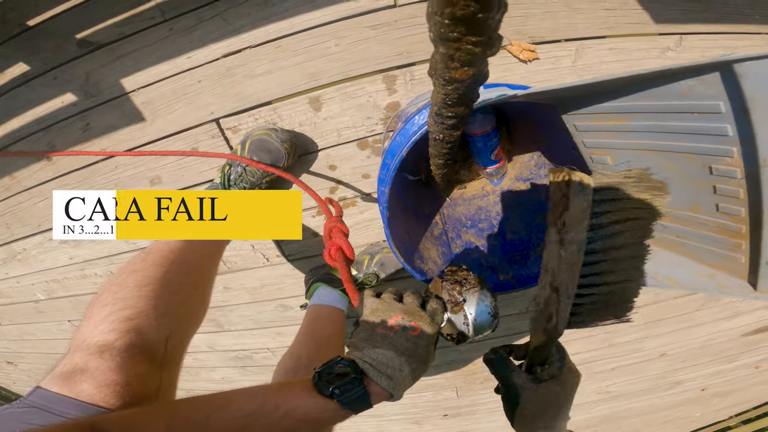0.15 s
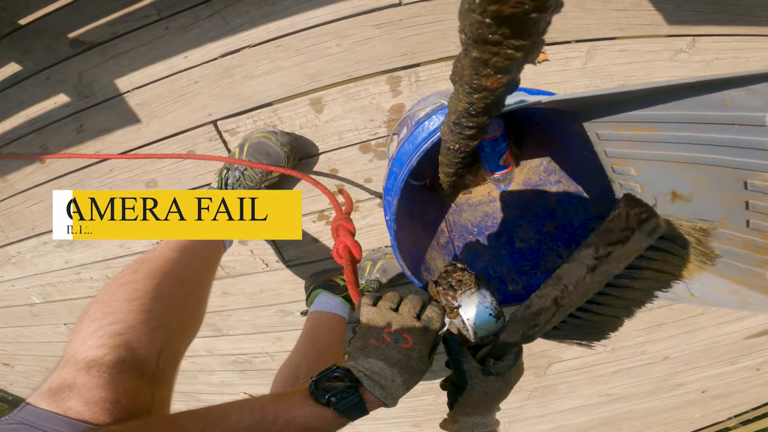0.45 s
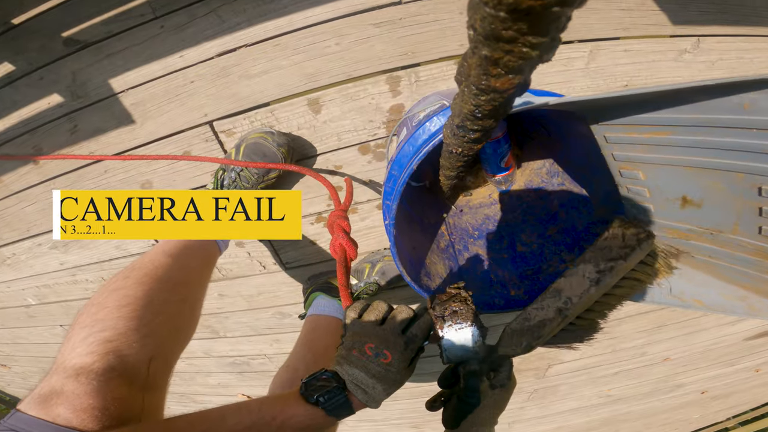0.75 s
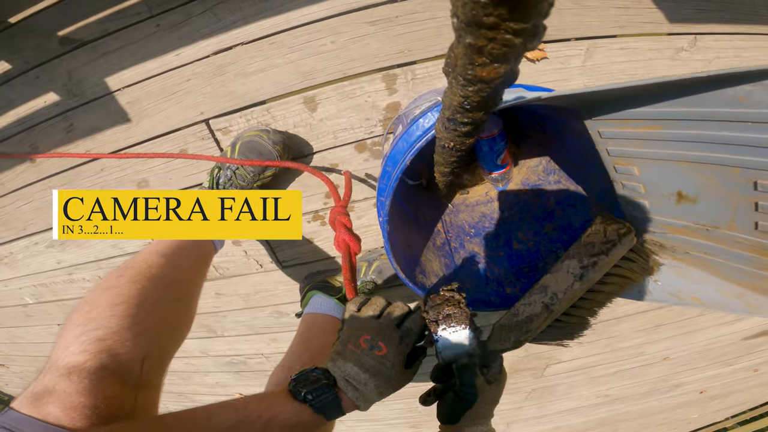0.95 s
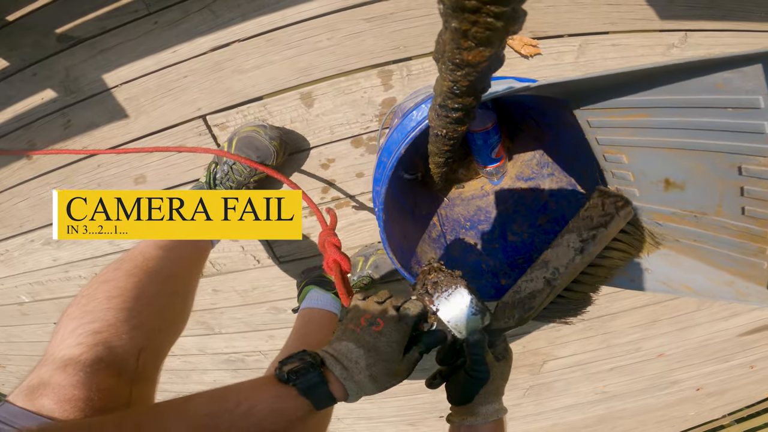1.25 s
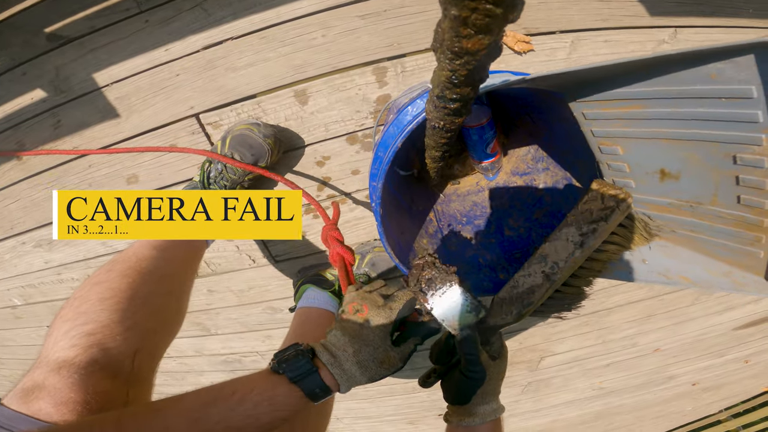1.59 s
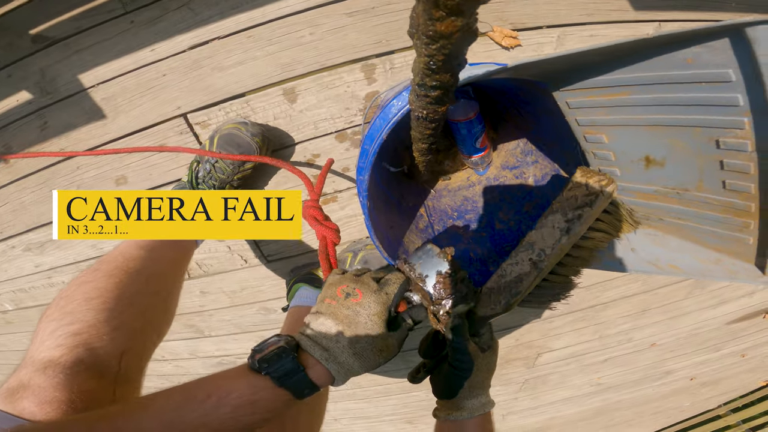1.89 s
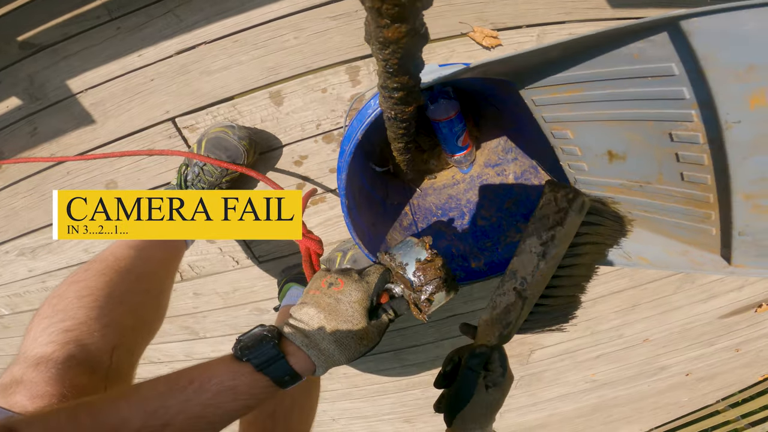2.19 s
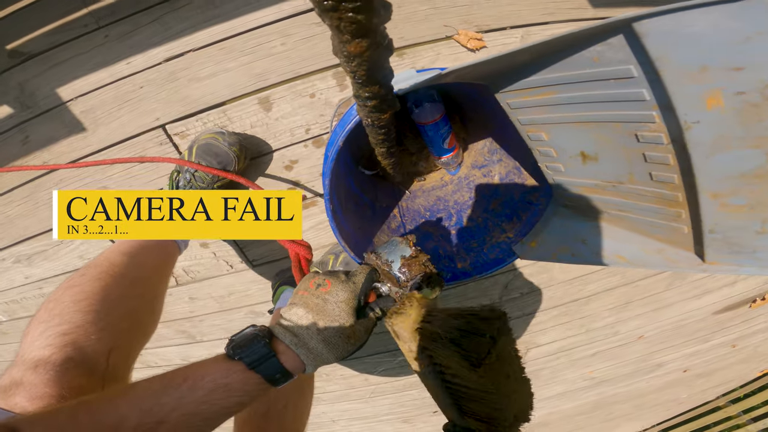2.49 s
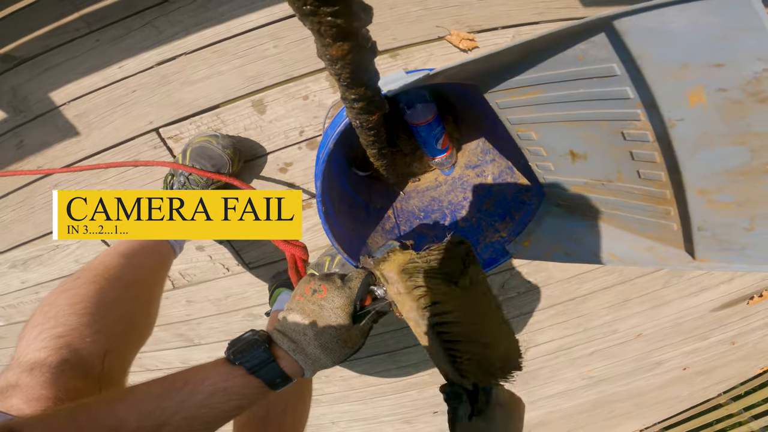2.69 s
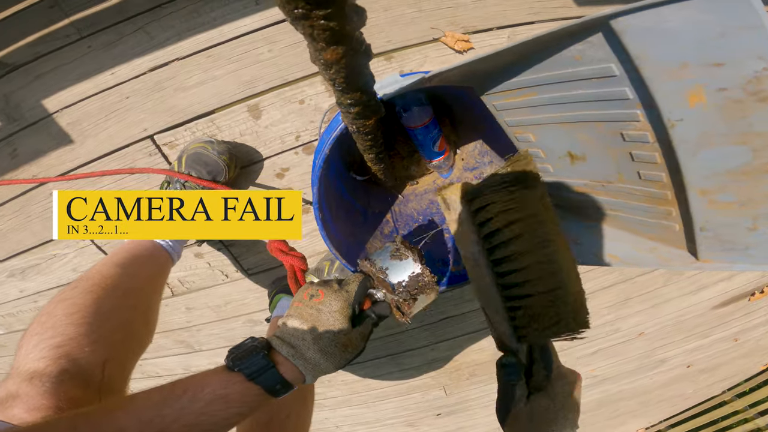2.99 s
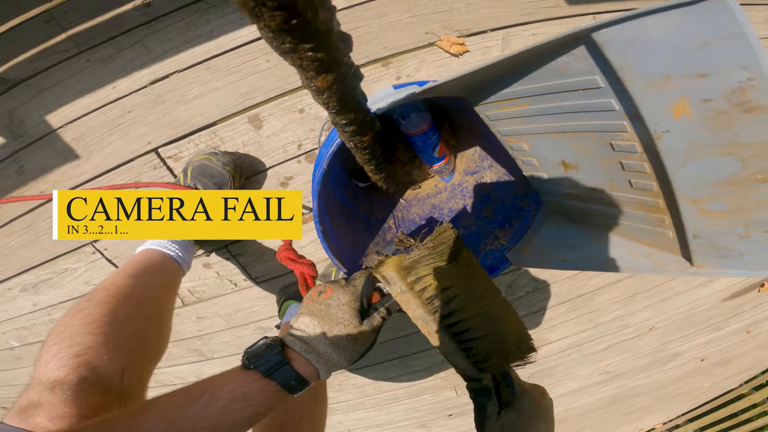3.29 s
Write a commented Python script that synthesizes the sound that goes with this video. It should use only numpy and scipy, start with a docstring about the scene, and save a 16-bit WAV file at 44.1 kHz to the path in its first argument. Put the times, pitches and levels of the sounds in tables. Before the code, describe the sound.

Close, gritty brush scrapes on rusty metal come first, then scattered knocks, a pause, and a harder final flurry of knocks and scrubbing; insects hiss steadily all around outdoors, with a faint far rumble.

```python
"""Rough rubs ring a hollow rusty fitting inside a dense hiss of insects, on a wooden deck outdoors.
A gloved hand works a stiff brush on the metal over a plastic tub: noisy forces ring the modes of both.
Sharp knocks ring the fitting and thump the tub; bristles spit bright grit as showers of coloured clicks.
Flickering noise makes the insect chorus and a low far rumble; gliding narrow bands and thin whistles call.
Gain control pulls the loudest moments down and recovers slowly."""
import sys
import numpy as np
from scipy import signal
from scipy.fft import rfft, irfft
from scipy.io import wavfile
from scipy.ndimage import uniform_filter1d

SR = 44100
rng = np.random.default_rng(int(sys.argv[2]) if len(sys.argv) > 2 else 0)


def master_out(mix):
    """Clip the mix to full scale and print it as 16-bit PCM to the path in sys.argv[1]."""
    frames = np.transpose(np.atleast_2d(mix))
    ceiling = np.clip(frames, -1, 1)
    pcm = np.round(ceiling * 32767).astype(np.int16)
    wavfile.write(sys.argv[1], SR, pcm)


def volts(x):
    """Linear amplitude factor 10**(x/20) for a level x in dB, scalar or array-like."""
    e = np.asarray(x, float) / 20
    return 10 ** e


N = 152145

# ringing modes of the metal fitting: pitch_hz, level_db (relative), t60_s (undamped)
FITTING_MODES = [(525, -6, 0.03), (843, -3.5, 0.027), (923, -2.5, 0.028), (1103, 3, 0.034),
                 (1284, -8, 0.067), (1430, -6, 0.042), (1631, -4.5, 0.05), (1880, -7.5, 0.022),
                 (2196, -7.5, 0.027), (2383, -7, 0.027), (2543, -8.5, 0.031), (2880, -12.5, 0.028),
                 (4360, -14, 0.022), (5380, -23, 0.013)]
# ringing modes of the plastic tub: pitch_hz, level_db (relative), t60_s
TUB_MODES = [(96.8, 0, 0.11), (138.6, 2.5, 0.13), (184.5, 0.5, 0.11), (238, 0.7, 0.062), (332, -5, 0.059),
             (454, -13, 0.044)]


def rms_one(x):
    """Scale a sound to an rms of 1."""
    return x / np.sqrt(np.mean(x ** 2) + 1e-20)


def at_hz(points, hz):
    """Read a curve of (Hz, dB) points along log frequency."""
    curve = np.array(points)
    return np.interp(np.log(hz), np.log(curve[:, 0]), curve[:, 1])


def level(rows):
    """Gain over time from (s, dB) points."""
    return volts(np.interp(np.arange(N) / SR, *np.transpose(rows)))


def swell(s, rise, fall, db):
    """A rounded rise and fall about the loudest moment."""
    t = np.arange(N) / SR - s
    place = np.clip(np.where(t < 0, t / rise, t / fall), -1, 1)
    return volts(db) * np.cos(np.pi / 2 * place) ** 2


def drift(rate):
    """Slow chance of spread 1: noise twice through a low-pass at rate Hz, drawn every 40 samples."""
    r = np.exp(-80 * np.pi * rate / SR)
    noise = rng.standard_normal(N // 40 + 2002)
    slow = signal.lfilter([1], [1, -2 * r, r * r], noise)[2000:]  # skip the filter's start
    return np.interp(np.arange(N) / 40, np.arange(len(slow)), rms_one(slow))


def ring(x, hz, t60):
    """A resonance: a unit click sets a decaying sine of starting height 1 ringing."""
    r, w = volts(-60 / (t60 * SR)), 2 * np.pi * hz / SR
    return signal.lfilter([0, np.sin(w)], [1, -2 * r * np.cos(w), r * r], x + 1e-18)


def colour(x, spectrum):
    """Shape a sound by a spectrum of (Hz, dB) points, held level beyond its ends."""
    hz = np.arange(N // 2 + 1) * SR / N + 1e-3
    return irfft(rfft(x) * volts(at_hz(spectrum, hz)), N)


def grains(rate, spread_db):
    """Random clicks of uneven size and either sign, at a mean rate per second; rms 1."""
    sizes = volts(spread_db * np.minimum(rng.exponential(1, N), 5)) * rng.choice([-1, 1], N)
    return rms_one(sizes * (rng.random(N) < rate / SR))


def struck(force, start, modes, pitch=1, hardness_db=0, damping=1, spread_db=1.2):
    """A short force rings every mode; soft contact favours the middle modes, hard contact the high ones."""
    out = np.zeros(N + SR)
    luck = rng.normal(0, spread_db, len(modes))  # each contact excites the modes unevenly
    signs = np.resize([1, -1], len(modes))
    force = np.pad(force, (0, SR // 6))  # room to ring on
    rung = 0
    for (hz, db, t60), luck_db, sign in zip(modes, luck, signs):
        octaves = np.log2(hz / 1120)
        tilt_db = min(hardness_db * octaves, abs(hardness_db) * octaves)
        # the grip shifts the hollow's air modes (Hz range); the metal's modes stay
        shift = pitch if 700 < hz < 1500 else 1
        rung = rung + sign * volts(db + luck_db + tilt_db) * ring(force, hz * shift, t60 * damping)
    out[start:start + len(force)] = rung
    return out[:N]


def rubs():
    """Dense slips under each rub drive the fitting and, more weakly, the tub."""
    # loudest_s, length_s, level_db (relative), pitch_factor, hardness_db_per_octave
    rub_rows = [(0.077, 0.09, -31.5, 1, -4), (0.126, 0.063, -33, 1.13, -0.5), (0.155, .04, -30, 1.02, -9),
                (0.185, .055, -23.5, 0.99, -10), (0.222, 0.045, -23, 1.03, -8),
                (0.246, 0.03, -24.5, 1.01, -20), (0.34, 0.29, -37, 1, 2.5), (0.476, 0.089, -32, 0.93, 3),
                (0.512, 0.038, -30, 1.04, 2), (0.552, 0.069, -29.5, 0.91, 1.5), (0.593, 0.061, -32, .92, 2),
                (0.729, 0.034, -33.5, 1.13, 6), (0.776, 0.067, -31.5, 0.83, 2.5),
                (0.88, 0.59, -39.5, 1.02, 2), (1.111, 0.075, -31.5, 1.16, 1), (1.681, 0.14, -32, 0.93, 2),
                (1.718, 0.038, -34.5, .9, 18), (1.741, 0.085, -29, 0.84, 2), (1.786, 0.08, -23, 0.93, 7),
                (1.821, 0.072, -21, .92, 3.5), (1.85, 0.046, -21, 0.84, -6), (1.87, 0.052, -29, 1, -1),
                (2.827, 0.035, -33.5, 1.2, -1), (2.891, 0.066, -33, 0.99, 2), (2.946, 0.037, -24, 1.01, -2),
                (2.976, 0.044, -32, 1.24, 6), (2.987, 0.045, -20.5, 0.81, -5),
                (3.007, 0.065, -21.5, 1.05, -10), (3.45, 0.048, -28, 0.87, -0.5)]
    rise_share, tub_db = 0.67, -35.5
    slips = grains(3000, spread_db=3.5)
    out = 0
    for s, length, db, pitch, hardness_db in rub_rows:
        rise, fall = length * rise_share, length * (1 - rise_share)
        start, end = max(int((s - rise) * SR), 0), int((s + fall) * SR)
        force = (slips * swell(s, rise, fall, 0))[start:end]
        rung = rms_one(struck(force, start, FITTING_MODES, pitch, hardness_db))
        rung = rung * np.sqrt(length * SR / N / 2)  # level refers to the rub's own length
        thump = struck(force, start, TUB_MODES)
        out = out + volts(db) * (rung + volts(tub_db) * thump)
    return out


def knocks():
    """A few ms of chatter into the fitting with a dry crack, and a soft push into the tub."""
    # start_s, ring_db and thump_db (before the trims), pitch_factor, hardness_db_per_octave
    knock_rows = [(0.818, -9.5, -31, 0.915, 2.5), (0.852, -21.5, -31.5, 0.93, -4),
                  (0.928, -19.5, -40, 0.94, 1), (1.098, -14, -52, 0.97, -6), (1.659, -11, -36, 0.82, 11),
                  (1.846, -10.5, -35, 0.97, -8), (2.05, -28, -48, 0.9, -8), (2.786, -11, -33, 1.12, 3),
                  (2.802, -21, -47, 0.73, 7), (2.849, -20.5, -32, 0.81, -4), (2.899, -22, -41, 0.71, -2),
                  (2.9655, -4, -15.5, 1.05, .4), (2.989, -10, -30, 1.12, -5),
                  (3.249, -15.5, -53, 0.95, 10.5), (3.329, -13, -29.5, 0.93, 6.5),
                  (3.345, -19, -31, 0.9, -2), (3.371, -23, -38, 0.96, 0)]
    ring_trim_db, thump_trim_db, crack_db = -2, 4.5, -12
    rise_s, decay_s, push_s = 0.0006, 0.0084, 0.0021
    first_touch = 11  # height of the first contact, against chatter of spread 1
    grip_damping = 0.44  # the gripping glove shortens the ring
    t = np.arange(SR // 30) / SR
    push = np.hanning(int(push_s * SR))
    push = push / push.sum()
    crack_edge = signal.butter(2, 3040, "high", fs=SR, output="sos")
    out = 0
    for s, db, thump_db, pitch, hardness_db in knock_rows:
        start = int(s * SR)
        force = rng.standard_normal(len(t)) * np.minimum(t / rise_s, 1) * np.exp(-t / decay_s)
        force[int(rise_s * SR)] += first_touch
        rung = struck(force, start, FITTING_MODES, pitch, hardness_db, grip_damping)
        rung = rung / abs(rung).max()
        # harder contact cracks louder
        rung[start:start + len(t)] += volts(crack_db + hardness_db) * signal.sosfilt(crack_edge, force)
        thump = struck(push, start, TUB_MODES)
        out = out + volts(db + ring_trim_db) * rung + volts(thump_db + thump_trim_db) * thump
    return out


def swish():
    """A short bright swish: noise twice through one resonance, under a swell."""
    # loudest_s, rise_s, fall_s, level_db (relative)
    swish_rows = [(2.86, 0.04, 0.018, -20.5)]
    hz, width_hz = 5150, 1000  # of each pass
    t60 = np.log(1000) / (np.pi * width_hz)
    noise = ring(ring(rng.standard_normal(N), hz, t60), hz, t60)
    return sum(swell(*row) for row in swish_rows) * rms_one(noise)


def bristles():
    """Bright grains as bristles flick free, scattered left and right."""
    # bursts of bristles and grit, each a run of: time_s, level_db (before the 10 dB lift)
    bursts = [
        [(0.47, -53), (0.496, -60), (0.514, -52), (0.532, -66), (0.542, -52), (0.56, -41), (0.57, -55),
         (0.58, -42), (0.64, -62)],
        [(0.64, -69), (0.66, -44), (0.67, -61), (0.72, -60), (0.734, -48), (0.746, -52), (0.774, -40),
         (0.79, -54), (0.8, -54)],
        [(0.8, -55), (0.808, -61), (0.82, -39), (0.844, -67), (0.852, -48), (0.876, -60), (0.89, -55)],
        [(1.08, -65), (1.104, -54), (1.13, -66)],
        [(1.2, -55), (1.218, -47.5), (1.224, -59), (1.24, -62)],
        [(1.64, -53), (1.65, -55), (1.66, -47), (1.678, -60), (1.7, -48)],
        [(1.7, -53), (1.722, -55), (1.762, -47), (1.81, -43.5), (1.838, -53), (1.876, -46), (1.902, -77),
         (1.91, -60)],
        [(2.03, -72), (2.042, -60), (2.052, -50), (2.08, -71)],
        [(2.77, -63), (2.784, -41.5), (2.798, -55), (2.804, -46), (2.83, -46)],
        [(2.83, -50), (2.85, -37.5), (2.87, -37.5), (2.882, -37.5), (2.896, -34.5), (2.904, -35.5),
         (2.964, -64), (2.97, -58)],
        [(3.24, -67), (3.248, -50), (3.254, -41), (3.268, -74), (3.28, -70)],
        [(3.32, -59), (3.328, -62), (3.336, -45), (3.36, -71), (3.37, -42), (3.38, -60), (3.418, -70),
         (3.45, -39.5)],
    ]
    # grit spectrum: frequency_hz, level_db (relative)
    grit_spectrum = [(880, -28), (1500, -8), (1820, -8.5), (2050, -15), (3610, -0.5), (6310, 3),
                     (6690, -0.5), (11700, -12), (15500, -27)]
    # grit width: frequency_hz, side_minus_mid_db
    grit_width = [(60, -24), (110, -21), (200, -18), (380, -17), (700, -14), (1290, -1), (2380, 2),
                  (4400, -7), (8120, -13), (15000, -1)]
    t = np.arange(N) / SR
    spray = sum(level(rows) * (t > rows[0][0]) * (t < rows[-1][0]) for rows in bursts)
    mid = rms_one(colour(grains(10000, spread_db=4), grit_spectrum))
    side = rms_one(colour(grains(10000, spread_db=4), grit_spectrum))
    return volts(10) * spray * (mid + colour(side, grit_width) * [[1], [-1]])


def panned(pair, balance):
    """Give half the left-minus-right difference to each side."""
    left = colour(pair[0], np.array(balance) * [1, 0.5])
    right = colour(pair[1], np.array(balance) * [1, -0.5])
    return np.array([left, right])


def hands():
    """Close handling: contacts lose their top, and a late, treble-weighted copy spreads them in stereo."""
    # balance of the near sounds: frequency_hz, left_minus_right_db
    near_balance = [(60, 1.5), (200, -2), (380, -2.5), (700, -5), (1290, -3.5), (2380, 4), (4400, -5),
                    (8120, 0), (15000, -1)]
    side_db, side_hz, lag_s = -4, 2420, 0.00024
    near = signal.sosfilt(signal.butter(4, 5640, fs=SR, output="sos"), rubs() + knocks())
    late = np.interp(np.arange(N) - lag_s * SR, np.arange(N), near)
    side = volts(side_db) * signal.sosfilt(signal.butter(1, side_hz, "high", fs=SR, output="sos"), late)
    return panned(near + side * [[1], [-1]] + bristles() + swish(), near_balance)


def wide(spectrum, patchy_db, rate):
    """Stereo noise whose half-octave-spaced bands each flicker on their own; rms 1."""
    # stereo width: frequency_hz, side_minus_mid_db
    width_curve = [(60, -65), (110, -64), (200, -17), (380, -16.5), (700, -8), (1290, -10.5), (2380, -4),
                   (4400, -9.5), (8120, -7.5), (15000, -4)]
    mid = colour(rng.standard_normal(N), spectrum)
    side = colour(colour(rng.standard_normal(N), spectrum), width_curve)
    pair = rfft([mid + side, mid - side])
    octave = np.log2(np.arange(N // 2 + 1) * SR / N + 1e-3)
    lowest, highest = np.log2(spectrum[0][0]), np.log2(spectrum[-1][0])
    out = 0
    for centre in np.arange(lowest, highest + 0.5, 0.5):
        band = np.clip(1 - 2 * abs(octave - centre), 0, 1)  # overlapping triangles
        out = out + volts(patchy_db * drift(rate)) * irfft(pair * band, N)
    return rms_one(out)


def chorus():
    """Dense insects all round: wide noise in their pitch range with a quick, slight flicker."""
    # insect spectrum: frequency_hz, level_db (relative)
    insect_spectrum = [(1350, -41), (2300, -13.5), (2530, -16), (2900, -6), (3170, -8), (3410, -4),
                       (3690, -2), (4360, -3), (4960, 2.5), (6260, -2.5), (7830, -14.5), (8550, -24.5),
                       (11000, -31.5), (12600, -30), (13900, -41), (15600, -58)]
    # loudness path: time_s, level_db (before the 1 dB lift)
    insect_level = [(0.0, -32), (0.52, -32.5), (0.89, -31.5), (2.12, -32), (2.5, -30.5), (2.79, -31.5),
                    (2.93, -33), (3.45, -32.5)]
    return level(insect_level) * volts(1.0) * wide(insect_spectrum, patchy_db=0.7, rate=21.0)


def singers():
    """Nearer insects: a wavering, gliding carrier roughened by slow chance into a narrow band."""
    # loudest_s, half_length_s, level_db (relative), pitch_hz, glide_hz_per_s
    singer_rows = [(0.3, .28, -50, 1830, 30), (1.57, 0.15, -48, 2020, -1100),
                   (2.45, 0.32, -46.5, 1830, -40), (3.26, 0.3, -44, 1840, 150), (2.3, .45, -48, 2850, 30),
                   (1.35, .3, -51, 2850, 30)]
    roughness_hz, waver_hz = 90, 25
    t = np.arange(N) / SR
    out = 0
    for s, half, db, hz, glide in singer_rows:
        phase = 2 * np.pi * np.cumsum(hz + glide * (t - s) + waver_hz * drift(5.0)) / SR
        voice = drift(roughness_hz) * np.sin(phase) + drift(roughness_hz) * np.cos(phase)
        out = out + swell(s, half, half, db) * voice
    return out


def whistles():
    """Thin far whistles: near sines whose pitch wavers a little."""
    # middle_s, half_length_s, level_db (relative), pitch_hz
    whistle_rows = [(1.048, .055, -33, 4030), (0.24, .05, -33, 4735)]
    out = 0
    for s, half, db, hz in whistle_rows:
        phase = 2 * np.pi * np.cumsum(hz * (1 + 0.001 * drift(10))) / SR
        out = out + swell(s, half, half, db) * np.sin(phase)
    return out


def rumble():
    """Low far rumble: wide dark noise with a slower, patchier flicker."""
    # rumble spectrum: frequency_hz, level_db (relative)
    rumble_spectrum = [(12, -32), (20, -4.5), (53, -2.5), (80, -1.5), (260, -18), (499, -18), (678, -23.5),
                       (831, -21), (978, -16.5), (1060, -20), (1530, -26), (1840, -26), (2600, -36.5),
                       (3380, -65), (5720, -120)]
    # loudness path: time_s, level_db (before the 2.5 dB lift)
    rumble_level = [(0.0, -33), (0.15, -30.5), (0.38, -32.5), (1.85, -34), (2.51, -34.5), (2.93, -32.5),
                    (3.1, -35), (3.45, -33.5)]
    return level(rumble_level) * volts(2.5) * wide(rumble_spectrum, patchy_db=2.0, rate=6.3)


def scene():
    """Handling up close, with insects and rumble around it."""
    # balance of the surroundings: frequency_hz, left_minus_right_db
    far_balance = [(60, 0.2), (200, 0.3), (700, 0.6), (1290, 1.2), (2380, 2.2), (4400, 0.7), (8120, 3.6),
                   (15000, 2)]
    surroundings = chorus() + rumble() + singers() + whistles()
    return hands() + panned(surroundings, far_balance)


def top_cut(x):
    """Nothing passes above the cut-off."""
    return signal.sosfilt(signal.butter(12, 15740, fs=SR, output="sos"), x)


def record(dry):
    """Gain control pulls loud moments down and recovers slowly; a low-pass dulls the extreme top."""
    knee_db, share, release_db_per_s = -18, 0.26, 25
    loudness_db = 10 * np.log10(uniform_filter1d(dry.mean(0) ** 2, size=441) + 1e-12)
    wanted_cut_db = share * np.maximum(loudness_db - knee_db, 0)
    # a running maximum against a ramp lets the cut fall back no faster than the release
    ramp = release_db_per_s * np.arange(N) / SR
    cut_db = np.maximum.accumulate(wanted_cut_db + ramp) - ramp
    dull = signal.sosfilt(signal.butter(6, 14700, fs=SR, output="sos"), dry)
    mix = dull * volts(-uniform_filter1d(cut_db, size=221))
    return top_cut(mix)


dry = scene()
out = record(dry)
master_out(out)
```